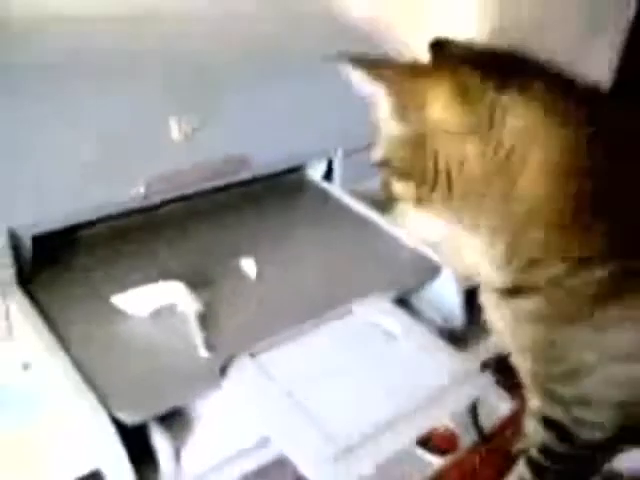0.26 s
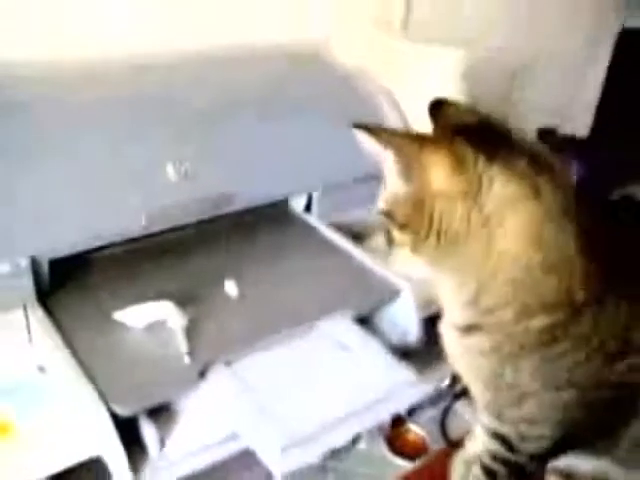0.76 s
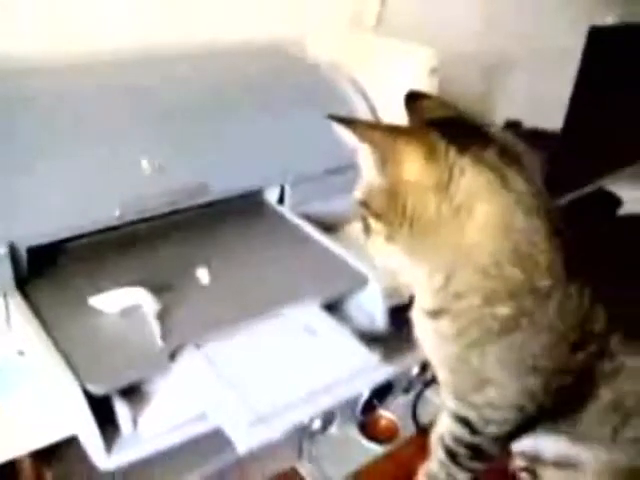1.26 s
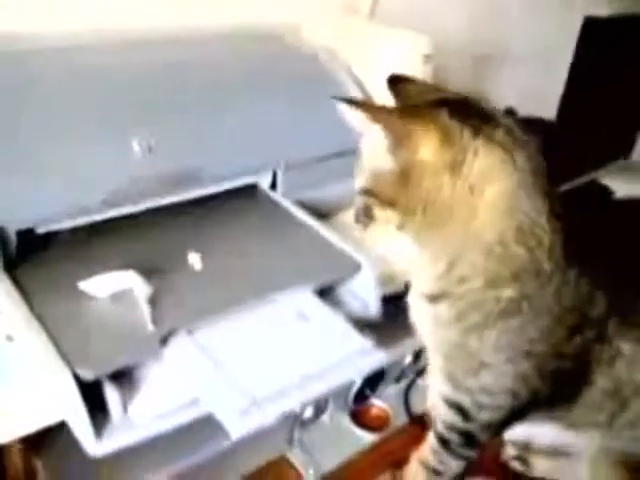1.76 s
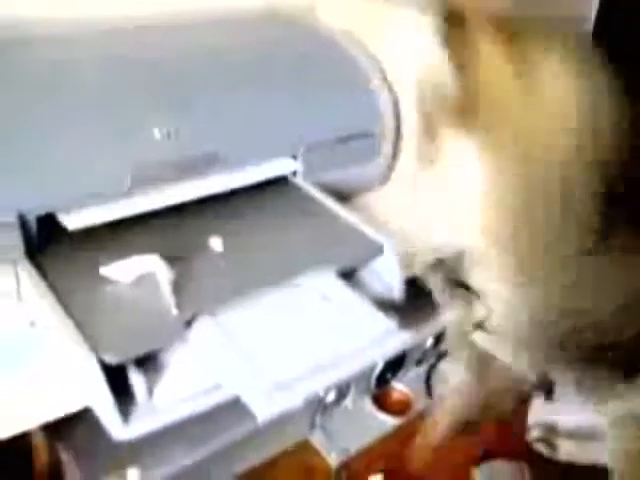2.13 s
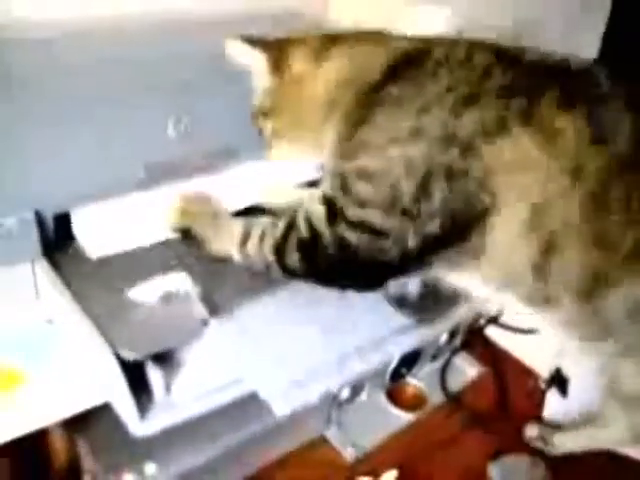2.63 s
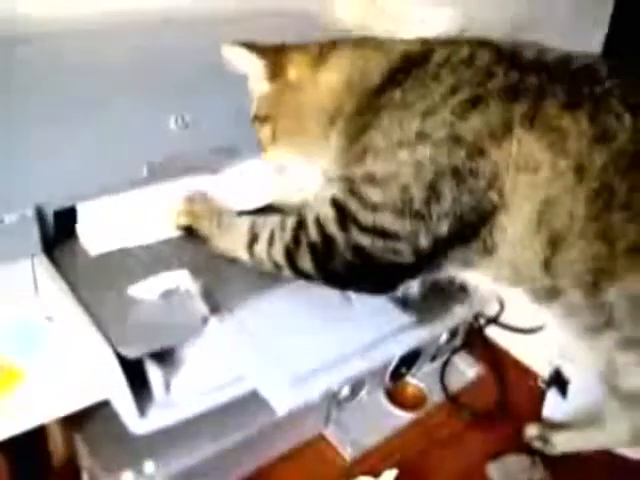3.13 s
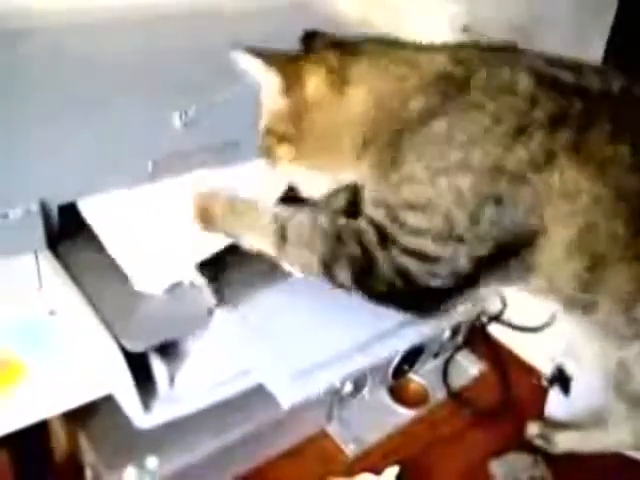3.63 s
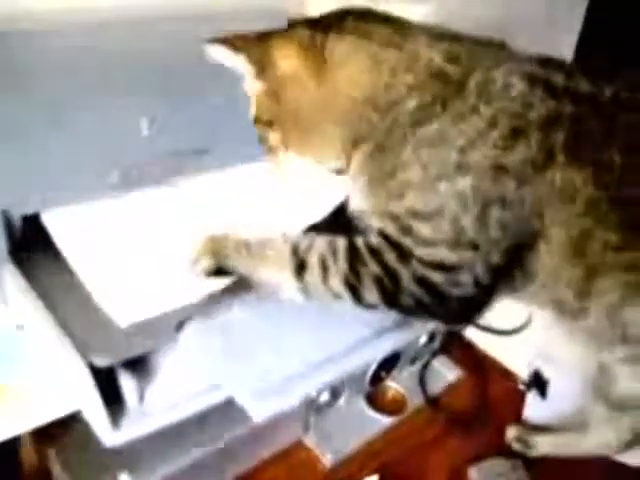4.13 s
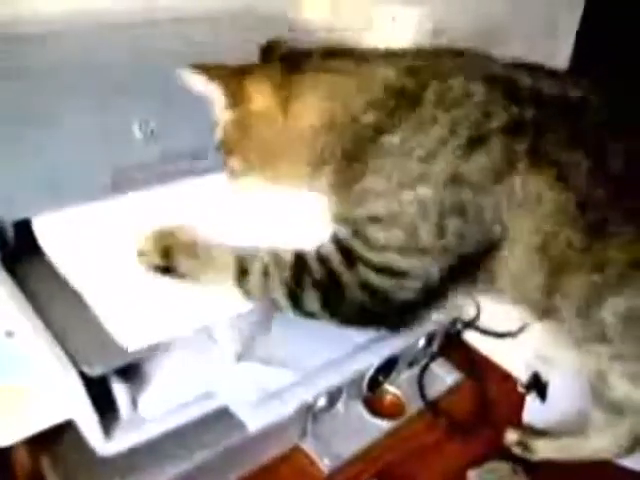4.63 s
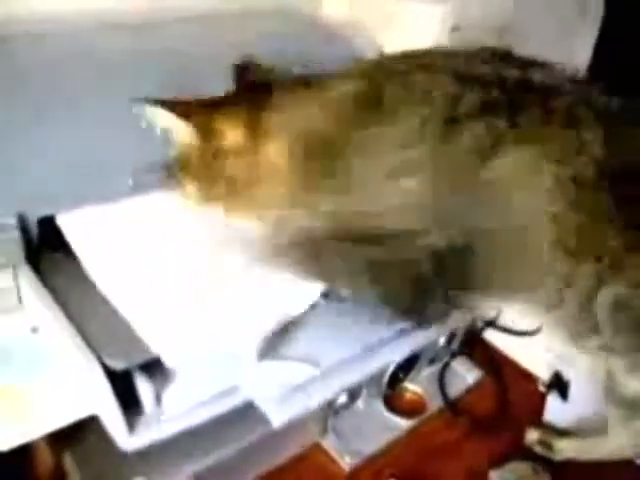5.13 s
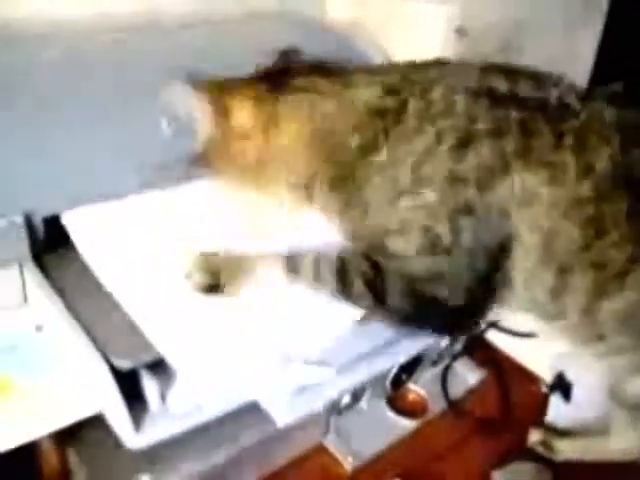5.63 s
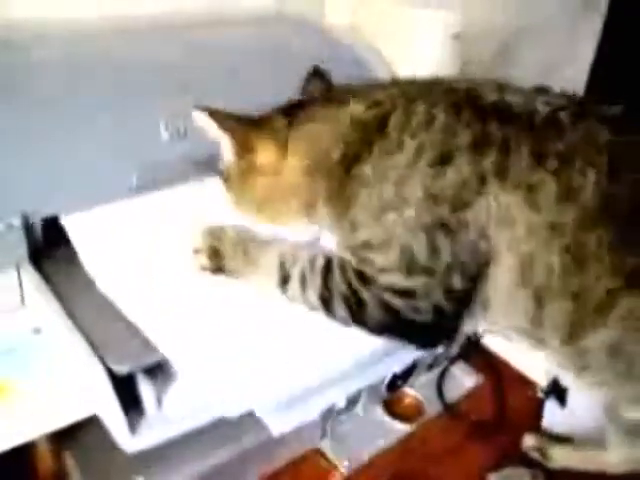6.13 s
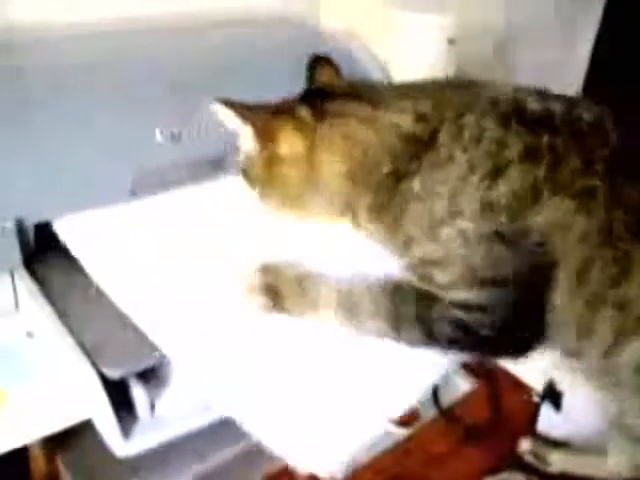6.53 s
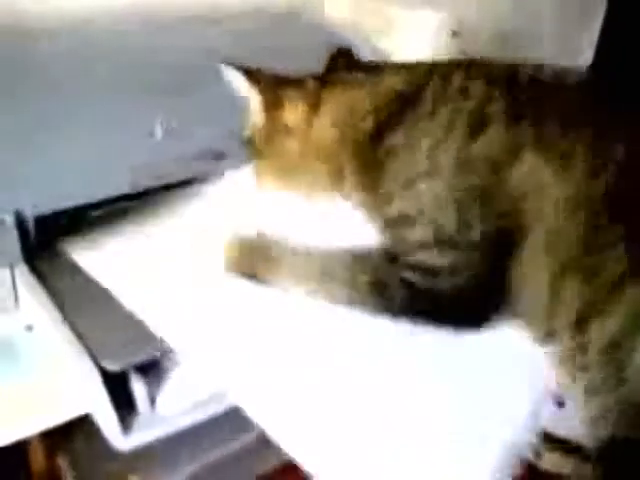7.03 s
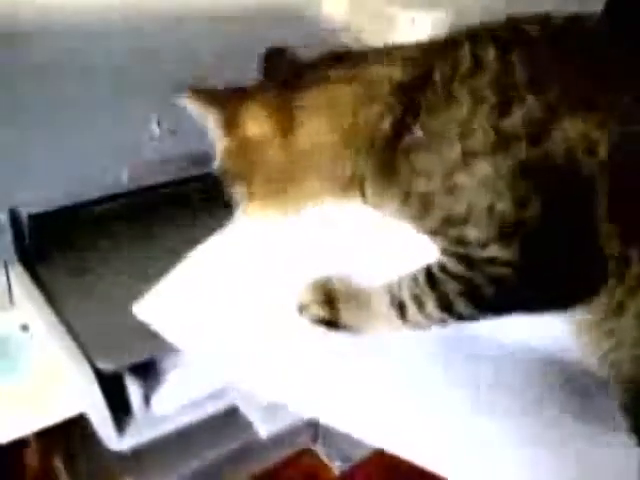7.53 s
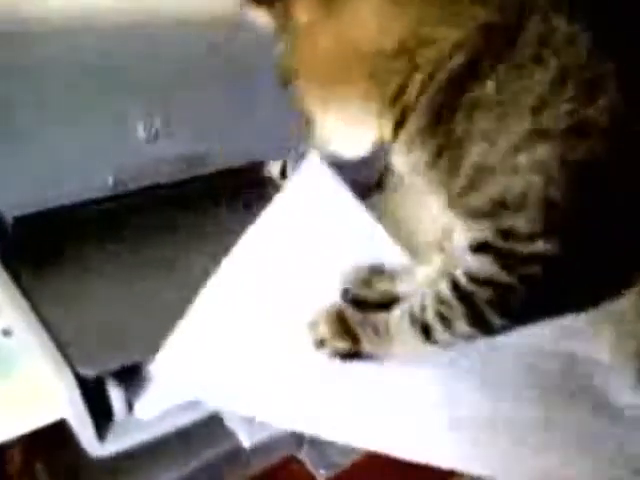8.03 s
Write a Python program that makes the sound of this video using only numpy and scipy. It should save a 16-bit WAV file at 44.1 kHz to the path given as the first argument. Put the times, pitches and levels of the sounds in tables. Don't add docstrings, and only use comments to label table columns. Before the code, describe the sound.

A cat's paw scrapes and knocks at paper on a hollow plastic printer tray while the printer whirs in quick, steady, pulsing passes.

```python
import sys
import numpy as np
from scipy import signal
from scipy.fft import rfft, irfft, next_fast_len
from scipy.io import wavfile
from scipy.ndimage import uniform_filter1d

SR = 44100
rng = np.random.default_rng(int(sys.argv[2]) if len(sys.argv) > 2 else 0)


def unload_wav(signal):
    wavfile.write(
        sys.argv[1],
        SR,
        np.round(np.clip(np.atleast_2d(signal).T, -1, 1) * 32767).astype(np.int16),
    )


def invert_db(level):
    return 10 ** (np.asarray(level, dtype=float) / 20)


N = 365588

# (frequency [Hz], level per Hz [dB])
AIR = [(12, -37.5), (20, 2), (75, 4.5), (179, -5), (254, -1), (577, -12.5), (838, -10), (926, -5),
       (1730, -24.5), (2840, -24.5), (3800, -23.5), (5000, -51.5), (7800, -45.5)]
# (frequency [Hz], width [Hz], rms level [dB])
FAN = [(60.8, 11, -48), (118.5, 20, -52.5), (257.1, 9.3, -46.5), (506, 21, -52), (759, 16, -53),
       (4830, 300, -70), (7000, 370, -78.5)]
AIR_DB = -38

# (frequency [Hz], level per Hz [dB])
PAPER = [(110, -1.5), (343, 1.5), (489, -1.5), (700, -0.5), (1000, 1.5), (1500, -8.5), (2100, -11.5),
         (2700, -4.5), (3300, -5), (4200, -21.5), (5500, -27.5), (7800, -34.5)]
# (time of top [s], level [dB], time to fall 20 dB [s], bright part over it [dB])
FLICKS = [(0.0, -29, 0.2, -15), (.102, -24, 0.09, -26), (2.32, -44, -0.5, -23), (2.38, -30, 0.12, 10),
          (2.63, -34, 0.8, -25), (2.861, -18.5, -0.01, -5.5), (3.173, -27, 0.34, -5.5), (4.37, -42, 0, -8),
          (4.54, -21, 0.11, -3), (4.67, -37, 0.7, -19), (5.756, -16.5, 0.09, -7.5), (6.18, -37.5, 1, -1),
          (6.601, -27, 0.04, -1.5), (6.657, -25, 0.12, -25), (6.897, -20.5, 0.17, -6),
          (7.031, -18, 0.15, -12.5), (7.32, -19, 0.24, -8.5), (8.22, -31, -1.1, -27)]
# (time of top [s], level [dB], time to rise 20 dB [s], time to fall 20 dB [s], bright part over it [dB])
SWEEPS = [(2.463, -18, 0.23, 0.16, -13.5), (2.759, -26.5, 0.15, 0.37, -11.5), (2.938, -24, 0.18, 0.08, -12),
          (3.45, -22, -0.13, 0.11, -6.5), (3.648, -25.5, 0.03, 0.09, -19.5), (3.752, -16.5, 0, 0.09, -6.5),
          (4.252, -37.5, 0.5, -0.14, -12.5), (5.238, -23, -0.01, 0.18, -6), (5.49, -37, 0.5, -0.2, -25),
          (6.328, -15.5, -0.0055, 0.08, -13), (6.447, -24, 0.24, 0.09, -14.5), (7.765, -24, 0.15, 0.3, -13),
          (3.431, -29, -0.23, 0.25, -15.5), (4.799, -33.5, 0.18, 0.62, -10), (7.327, -21, .03, -0.19, 0),
          (5.97, -26.5, 0.21, 0.11, -8.5)]
# (start [s], length [s], level [dB], bright part over it [dB])
DRAGS = [(0.06, 0.047, -29.5, -10), (0.121, 0.18, -26.5, -12.5), (0.394, 0.077, -31.5, -15),
         (0.98, 0.019, -36, -5.5), (1.78, 0.042, -34.5, -9.5), (3.009, 0.12, -33, -9.5),
         (3.925, 0.14, -40, -23), (4.76, 0.3, -40, -6), (5.177, 0.066, -28.5, -8),
         (5.578, 0.35, -36.5, -11), (5.859, 0.11, -27, -9.5), (6.307, .03, -20, -10.5),
         (6.778, 0.046, -21, -7), (7.156, 0.28, -33.5, -13), (2.378, 0.037, -20.5, -8),
         (2.919, 0.031, -25.5, -5), (3.727, 0.06, -23, -6), (0.278, 0.047, -28.5, -17),
         (0.427, 0.042, -31.5, -11), (4.569, 0.047, -30, -7.5), (7.038, 0.051, -27, -10.5),
         (7.569, 0.055, -30.5, -8), (7.73, 0.026, -38, -16), (7.866, .11, -28, -13.5),
         (8.065, 0.073, -28.5, -14.5)]
FLICK_RISE_S, DRAG_RISE_S, DRAG_FALL_S = 0.022, 0.015, 0.061
DULL_FOLLOWS, DULL_DB = 0.65, -18

# (time [s], peak [dB], ringing [Hz], bright part over it [dB])
TICKS = [(0.095, -5, 1020, -23), (0.102, -4, 1062, -23), (0.19, -18.5, 668, -23), (0.394, -19, 860, -22),
         (0.446, -16, 730, -19), (1.431, -23, 1010, -24.5), (2.375, -10.5, 1050, -11),
         (2.437, -5.5, 990, -7), (2.459, -4.5, 1136, -12), (2.507, -11, 773, -20),
         (2.626, -7.5, 997, -14.5), (2.727, -13.5, 1040, -8), (2.757, -7.5, 684, -6), (2.79, -22, 716, -23),
         (2.854, -12.5, 1010, -15.5), (2.873, -9, 678, -29), (3.021, -15, 1090, -16), (3.18, -13, 673, -5),
         (3.218, -17, 710, -16.5), (3.423, -22, 972, -10), (3.664, -18, 980, -23), (3.705, -20, 668, -12.5),
         (3.714, -11, 680, -10), (3.744, -10, 775, -15), (4.072, -17.5, 1030, -11),
         (4.525, -17, 1030, -11.5), (4.538, -16, 730, -12), (4.669, -7.5, 1006, -24.5),
         (4.8, -21.5, 1010, -14), (5.218, -14.5, 1000, -12), (5.843, -24, 1190, -15),
         (5.844, -16, 1020, -19), (5.906, -14, 751, -6), (6.279, -4, 1037, -7), (6.314, -4, 1030, -22.5),
         (6.337, -12, 956, -17), (6.343, -11, 860, -22), (6.424, -12, 1123, -2.5), (6.475, -24, 899, -19),
         (6.783, -19, 756, -17), (6.966, -12.5, 760, -3), (6.994, -11, 689, -3), (7.032, 2.5, 795, -22),
         (7.184, -18, 790, -26), (7.343, -10.5, 1010, -20), (7.751, -8.5, 1026, -13.5),
         (7.825, -14, 1165, -20), (7.866, -11.5, 580, -23), (7.972, -18, 726, -15), (7.985, -25, 745, -18)]
TICK_T60_S, TICK_BRIGHT_DB, TICK_TOP_DB, TICK_DB = 0.019, 4.5, -28, -3.5

# (time [s], peak [dB], ringing [Hz], bright part over it [dB])
SNAPS = [(0.097, -11, 1045, -8), (0.102, -7.5, 1010, -10), (0.232, -26, 880, -10), (0.293, -15.5, 820, -15),
         (0.407, -18.5, 827, -11), (2.402, -12.5, 670, -17), (2.461, -12.5, 1010, 4.5),
         (2.485, -11.5, 1024, 0), (2.626, -13, 1020, -6.5), (2.64, -12, 862, -3.5),
         (2.727, -18.5, 1047, -1), (2.545, -22, 820, 3.5), (2.915, -29.5, 820, 0.5),
         (3.016, -19.5, 1015, -17), (3.455, -20.5, 764, 1.5), (3.759, -8.5, 664, -8.5),
         (4.537, -11, 1580, -6), (4.537, -20.5, 760, -3), (4.652, -27, 1120, -20), (5.179, -25, 1010, -19),
         (5.238, -17.5, 985, -5), (5.752, -10, 1000, -18), (6.279, -9.5, 1010, -5.5),
         (6.314, -12.5, 980, -1), (6.646, -27, 965, -3.5), (6.809, -17.5, 775, -6),
         (6.872, -27.5, 860, 7.5), (6.966, -23, 775, 11.5), (7.059, -11, 780, -7), (7.751, -9.5, 1114, -3),
         (7.865, -32, 1040, -16)]
# (time [s], peak [dB], ringing [Hz], time to fade 60 dB [s])
TAPS = [(2.377, -18, 1110, .05), (2.452, -10, 1316, 0.064), (2.758, -14, 645, 0.17),
        (2.853, -9.5, 1000, 0.083), (2.871, -17.5, 670, 0.096), (2.94, -19, 1010, 0.1),
        (3.164, -19, 680, 0.22), (3.647, -20.5, 875, 0.077), (4.669, -14, 1070, 0.078),
        (5.843, -13.5, 903, 0.045), (5.858, -16, 1060, .051), (5.908, -13, 794, 0.1),
        (6.18, -19.5, 840, 0.05), (6.326, -6, 820, 0.064), (6.422, -14, 1166, 0.063),
        (7.184, -29, 810, 0.094), (7.319, -10, 1130, 0.16), (7.456, -24, 850, .091),
        (7.479, -18, 540, 0.12), (7.762, -10.5, 1010, 0.034), (7.828, -16, 1160, 0.07),
        (8.069, -27, 810, 0.15)]
# (time [s], peak [dB], ringing [Hz], bright part over it [dB], thud over it [dB])
THUMPS = [(1.414, -23, 834, -12.5, -1), (2.359, -26.5, 848, 0, 0.5), (2.385, -19.5, 870, -4.5, 9.5),
          (2.437, -10, 1010, -1.5, 2), (2.768, -14, 690, -33, -17), (3.088, -22, 1180, -5.5, -5),
          (3.247, -20.5, 681, -7, 1.5), (3.714, -11, 686, -7, -5.5), (3.744, -12, 754, -6.5, 2),
          (4.073, -25, 1034, 3.5, -6), (4.883, -22, 1096, -22, -3.5), (5.201, -16.5, 737, -7, -5),
          (5.217, -23.5, 777, 0, -21), (5.758, -17, 1026, -10, 1), (6.661, -18, 986, -20.5, 1),
          (6.782, -18.5, 870, -0.5, 4), (6.897, -12.5, 840, -24, 3), (6.992, -19.5, 747, -27, -5.5),
          (7.028, -7.5, 764, -5.5, 4.5), (7.367, -10, 1045, -5, -11.5), (7.528, -21.5, 714, -24, 3.5),
          (7.647, -19, 740, -8, 0.5), (7.721, -21.5, 1110, -4, -14.5)]
SNAP_T60_S, THUMP_T60_S, TAP_BRIGHT_DB, LIGHT_THUD_DB = 0.076, 0.11, -32.5, -20
TRAY_THUD_HZ, TRAY_THUD_T60_S = 119.2, 0.44
BOOM_DB = -5.5

# (time [s], pitch [Hz], level [dB])
LEAD_IN = [
    (.47, 876, -67),
    (.49, 821, -36),
    (0.533, 844, -41),
    (0.556, 830, -54.5),
]
FIRST_PASS_S, PASS_S, LAST_PASS_S = 0.554, 0.2013, 8.2
# (time from whine centre [s], pitch [Hz], level [dB])
WHINE = [
    (-.06, 790, -77.5),
    (-.045, 805, -49.5),
    (-.032, 822, -42),
    (-.015, 838, -39),
    (0, 842, -36.5),
    (.015, 832, -38),
    (.032, 808, -48),
    (.045, 785, -58),
]
WHINE_OCTAVE_HZ, WHINE_OCTAVE_DB = 1600, -28
# (whine over the usual [dB], feed over the usual [dB])
PASS_LOAD_DB = [(1.5, 1.5), (-4.5, 1), (-4, 0.5), (0, 0.5), (-2.5, 2.5), (-0.5, 0.5), (-0.5, 1), (-2.5, 2),
                (-1.5, 0.5), (-8, -4), (-5, -1), (-7.5, -0.5), (-13.5, 3), (0.5, 1.5), (-7, 5.5), (-4.5, 3),
                (-1.5, 1.5), (-3, -4), (-4, -1), (-1.5, -0.5), (3, 0), (-4, -8), (-1, -1.5), (-2, 0.5),
                (-3, 0.5), (-3, -1.5), (-5, -3), (-3, -2.5), (0.5, -11.5), (-6, -6.5), (-6, 2.5), (6.5, 0),
                (-11, -7), (-14, -12), (-10, -1), (-8, -7.5), (-9, 4), (-8, 0), (-10, -9)]
# (time from whine centre [s], peak [dB])
JOLTS = [
    (-.02, -35),
    (.06, -28.5),
    (.112, -33),
]
# (time from whine centre [s], level [dB])
FEED = [
    (0.023, -60.5),
    (0.043, -41),
    (0.066, -34.5),
    (0.073, -32),
    (0.097, -33),
    (.115, -40.5),
    (0.129, -51),
    (0.149, -63),
]
# (frequency [Hz], width [Hz], level [dB])
FEED_BODY = [(335, 230, 0.5), (705, 109, 7), (1010, 78, 7), (1130, 130, 0.5), (1470, 130, -8.5),
             (2030, 140, -16.5), (2760, 700, -9), (4600, 340, -33.5), (6700, 180, -25.5)]

ROOM_T60_S, ROOM_DB = 0.22, -19.5
OVERLOAD = 0.8
# (frequency [Hz], level [dB])
MICROPHONE = [(3000, -0.5), (3500, -9), (4200, -10.5), (4900, -4), (5800, -17.5), (6700, 4.5), (7200, 12),
              (7700, 4.5)]
CUTOFF_HZ = 7800
# (frequency [Hz], level [dB])
KEEP_ABOVE = [(3600, -92.5), (4300, -84.5), (4900, -89.5), (5400, -89.5), (5900, -78.5), (6700, -84.5),
              (7600, -83)]
WAVER_DB = 8
WEAK_LINE_DB = -2.5


def rms_one(x):
    return x / np.sqrt(np.mean(x ** 2) + 1e-20)


def seconds():
    return np.arange(N) / SR


def at_hz(points, hz):
    point_hz, level_db = np.array(points)[:, 0], np.array(points)[:, 1]
    return np.interp(np.log(hz), np.log(point_hz), level_db)


def coloured(x, points):
    size = next_fast_len(N)
    hz = np.arange(1, size // 2 + 2) * SR / size
    return irfft(rfft(x, size) * invert_db(at_hz(points, hz)), size)[:N]


def drift(rate):
    step = 40
    r = np.exp(-2 * np.pi * step * rate / SR)
    noise = rng.standard_normal(N // step + 2002)
    slow = signal.lfilter([1], [1, -2 * r, r * r], noise)[2000:]
    return np.interp(np.arange(N) / step, np.arange(len(slow)), rms_one(slow))


def resonance(x, hz, width_hz):
    r = np.exp(-np.pi * width_hz / SR)
    top = np.array([1, 0, -1]) * (1 - r * r) / 2
    return signal.lfilter(top, [1, -2 * r * np.cos(2 * np.pi * hz / SR), r * r], x + 1e-18)


def double_resonance(x, hz, width_hz):
    return resonance(resonance(x, hz, width_hz), hz, width_hz)


def band(x, low_hz, high_hz):
    sos = signal.butter(2, [low_hz, high_hz], "band", fs=SR, output="sos")
    return signal.sosfilt(sos, x + 1e-18)


def thirds(low_hz):
    edges = low_hz * 2 ** (np.arange(40) / 3)
    edges = edges[edges < 1.1 * CUTOFF_HZ]
    return zip(edges, edges[1:])


def grains(per_s, spread_db):
    sizes = invert_db(spread_db * np.minimum(rng.exponential(1, N), 4)) * rng.standard_normal(N)
    return rms_one(sizes * (rng.random(N) < per_s / SR))


def room_air():
    air = coloured(rng.standard_normal(N), AIR)
    hums = 0
    for hz, width, db in FAN:
        hums = hums + invert_db(db) * rms_one(double_resonance(rng.standard_normal(N), hz, width))
    swell_db = 1.5 * drift(6)
    return invert_db(AIR_DB + swell_db) * rms_one(air) + hums


def strokes_db():
    rows = [(s, db, FLICK_RISE_S, 0, fall, bright) for s, db, fall, bright in FLICKS]
    rows += [(s, db, rise, 0, fall, bright) for s, db, rise, fall, bright in SWEEPS]
    rows += [(s, db, DRAG_RISE_S, length, DRAG_FALL_S, bright) for s, length, db, bright in DRAGS]
    s, top_db, rise, hold, fall, bright_db = np.transpose(rows)[:, :, None]
    t = seconds()[::40]
    below_db = 20 * np.maximum(s - t, 0) / np.maximum(rise, 0.005)
    below_db = below_db + 20 * np.maximum(t - s - hold, 0) / np.maximum(fall, 0.005)
    levels = []
    for db in (top_db - below_db, top_db - below_db + bright_db):
        total_db = 10 * np.log10(np.sum(invert_db(2 * db), axis=0) + 1e-9)
        levels.append(np.interp(seconds(), t, total_db))
    return levels


def paper():
    stroke_db, bright_db = strokes_db()
    dull_db = DULL_FOLLOWS * stroke_db + DULL_DB
    fine_db = 0.65 * bright_db - 26.0
    levels_db = (dull_db, stroke_db - 3.0, bright_db, fine_db)
    clumps = invert_db(2.0 * drift(45))
    sources = [clumps * (grains(3500, 1.4) + rng.standard_normal(N)) for _ in range(3)]
    parts = np.zeros((4, N))
    for k, (low, high) in enumerate(thirds(111.4)):
        hz = np.sqrt(low * high)
        which = np.searchsorted([470, 1700, 3800], hz)
        patchy_db = 3.5 * drift(30)
        parts[which] += invert_db(at_hz(PAPER, hz) + patchy_db) * band(sources[k % 3], low, high)
    return sum(invert_db(db) * rms_one(part) for db, part in zip(levels_db, parts))


def claws():
    out, size = np.zeros(N + SR), SR // 10
    click = np.eye(1, size)[0]
    bright = band(resonance(click, 2750, 270), 1500, 4000)
    top = band(click, 3200, 7600)
    for s, peak_db, hz, bright_db in TICKS:
        panel = band(resonance(click, hz, 2.2 / TICK_T60_S), hz / 2, 2 * hz)
        parts = (0, panel), (bright_db + TICK_BRIGHT_DB, bright), (bright_db + TICK_TOP_DB, top)
        tick = sum(invert_db(peak_db + TICK_DB + db) * v / np.abs(v).max() for db, v in parts)
        out[round(s * SR):][:size] += tick
    return out[:N]


def tray_thud(pushes):
    r, w = invert_db(-60 / (TRAY_THUD_T60_S * SR)), 2 * np.pi * TRAY_THUD_HZ / SR
    sway = signal.lfilter([0, np.sin(w)], [1, -2 * r * np.cos(w), r * r], pushes + 1e-18)
    return band(sway, 120, 600)


def blows():
    out, pushes, size = np.zeros(N + SR), np.zeros(N), SR // 5
    t = np.arange(size) / SR
    rows = [(s, db, hz, bright, LIGHT_THUD_DB, SNAP_T60_S) for s, db, hz, bright in SNAPS]
    rows += [(s, db, hz, bright, thud, THUMP_T60_S) for s, db, hz, bright, thud in THUMPS]
    rows += [(s, db, hz, TAP_BRIGHT_DB, LIGHT_THUD_DB, t60) for s, db, hz, t60 in TAPS]
    s, peak_db, hz, bright_db, thud_db, t60 = np.transpose(rows)[:, :, None]
    fade = invert_db(-60 * t / np.clip(t60, 0.02, 0.14)) * np.minimum(t / 0.0008, 1)
    fade = fade * (1 + 0.6 * invert_db(-60 * t / 0.0048))
    rebounds = 1 + 1.5 * (rng.random(fade.shape) < 0.03)
    contact = rng.standard_normal(fade.shape) * rebounds * fade
    ringing = np.array([resonance(c, f, 70) for c, f in zip(contact, hz[:, 0])])
    panel = band(ringing + 0.25 * contact, 480, 1350)
    crack = band(contact, 2200, 3400) + 0.3 * band(contact, 1400, 2200)
    crack = crack + 0.08 * band(contact, 3800, 7600)
    boom = band(contact, 150, 420)
    parts = (0, panel), (bright_db, crack), (thud_db + BOOM_DB, boom)
    hits = sum(invert_db(peak_db + db) * v / np.abs(v).max(axis=1, keepdims=True) for db, v in parts)
    starts = np.round(s[:, 0] * SR).astype(int)
    for at, hit, db in zip(starts, hits, (peak_db + thud_db)[:, 0]):
        out[at:at + size] += hit
        pushes[at] = invert_db(db - 12.0)
    return out[:N] + tray_thud(pushes)


def lead_in():
    s, hz, level_db = np.transpose(LEAD_IN)
    pitch = np.interp(seconds(), s, hz) * (1 + 0.0068 * drift(40))
    level = invert_db(np.interp(seconds(), s, level_db, left=-99, right=-99) + 3.3 * drift(50))
    return np.sqrt(2) * level * np.sin(2 * np.pi * np.cumsum(pitch) / SR)


def pass_clock(start_s):
    since = seconds() - FIRST_PASS_S - start_s
    number = np.floor(since / PASS_S).astype(int)
    running = (since > 0) & (seconds() < LAST_PASS_S)
    return since - number * PASS_S + start_s, np.maximum(number, 0), running


def carriage():
    s, hz, level_db = np.transpose(WHINE)
    t, number, running = pass_clock(s[0])
    belt_uneven_db = 4.2 * rng.standard_normal(99)[number]
    pitch = np.interp(t, s, hz) * (1 + 0.011 * drift(60))
    load_db = np.array(PASS_LOAD_DB)[number, 0] + 3.0 * drift(36)
    tone = invert_db(load_db) * np.sin(2 * np.pi * np.cumsum(pitch) / SR)
    belt = rms_one(double_resonance(rng.standard_normal(N), WHINE_OCTAVE_HZ, 70))
    belt = invert_db(WHINE_OCTAVE_DB + belt_uneven_db) * belt
    level = invert_db(np.interp(t, s, level_db, right=-90))
    return np.sqrt(2) * running * level * (tone + belt)


def chassis():
    starts = np.arange(FIRST_PASS_S, LAST_PASS_S, PASS_S)
    pushes = np.zeros(N)
    chance = rng.standard_normal((len(starts), len(JOLTS), 2))
    for k, (s, peak_db) in enumerate(JOLTS):
        at = ((starts + s + 0.0053 * chance[:, k, 0]) * SR).astype(int)
        pushes[at] = invert_db(peak_db + 2.4 * chance[:, k, 1]) * (-1) ** k
    rung = resonance(resonance(pushes, 57, 76), 78, 160)
    return rung * np.abs(pushes).max() / np.abs(rung).max()


def feed_rollers():
    s, level_db = np.transpose(FEED)
    t, number, running = pass_clock(s[0])
    teeth = [grains(6000, 1.2) * invert_db(2.5 * drift(60)) for _ in range(2)]
    favour_db = 2.3 * rng.standard_normal((99, len(FEED_BODY)))
    shell = 0
    for k, (hz, width, db) in enumerate(FEED_BODY):
        ringing = double_resonance(teeth[k % 2], hz, 1.62 * width)
        shell = shell + ringing * invert_db(db + favour_db[number, k]) * (-1) ** k
    load_db = np.array(PASS_LOAD_DB)[number, 1]
    return running * invert_db(np.interp(t, s, level_db, right=-90) + load_db) * rms_one(shell)


def room(x):
    size = next_fast_len(N + SR)
    turn = -2j * np.pi * np.arange(size // 2 + 1) / size
    echoes = 0
    for k, lag in enumerate(rng.uniform(0.008, 0.03, 8) * SR):
        loop = invert_db(-60 * lag / SR / ROOM_T60_S) * np.exp(turn * lag)
        echoes = echoes + (-1) ** k * loop / (1 - loop)
    return irfft(rfft(x, size) * echoes, size)[:N]


def scene():
    near = paper() + claws() + blows() + lead_in() + carriage() + chassis() + feed_rollers()
    return (near + invert_db(ROOM_DB) * room(near) + room_air())[None]


def patchy_treble(x):
    hz, t, frames = signal.stft(x, SR, nperseg=1536)
    loud_db = 10 * np.log10(np.mean(np.abs(frames) ** 2, axis=0) + 1e-14) + 60
    edges = np.geomspace(3450, 8000, 14)
    waver_db = uniform_filter1d(rng.standard_normal((len(edges), len(t))), size=4, axis=1)
    waver_db = waver_db + 1.2 * waver_db[-1]
    for k, (low, high) in enumerate(zip(edges, edges[1:])):
        rows = (hz >= low) & (hz < high)
        lines_db = 20 * np.log10(np.abs(frames[rows]) + 1e-9)
        level_db = 10 * np.log10(np.mean(np.abs(frames[rows]) ** 2, axis=0) + 1e-14)
        limit_db = at_hz(KEEP_ABOVE, np.sqrt(low * high)) + 0.24 * loud_db + WAVER_DB * waver_db[k]
        frames[rows] *= (level_db > limit_db) & (lines_db > limit_db - 3.0)
    power = np.abs(frames) ** 2
    nearby = uniform_filter1d(power, size=15, axis=0)
    frames *= (hz[:, None] < 900) | (power > invert_db(2 * WEAK_LINE_DB) * nearby)
    return signal.istft(frames, SR, nperseg=1536)[1][:N]


def roll_off(x):
    return signal.sosfilt(signal.butter(12, 7840, fs=SR, output="sos"), x)


def record(dry):
    x = coloured(OVERLOAD * np.tanh(dry[0] / OVERLOAD), MICROPHONE)
    top_cut = signal.cheby2(10, 60, 1.04 * CUTOFF_HZ, fs=SR, output="sos")
    mix = patchy_treble(signal.sosfilt(top_cut, x))[None]
    return roll_off(mix)


dry = scene()
out = record(dry)
unload_wav(out)
```